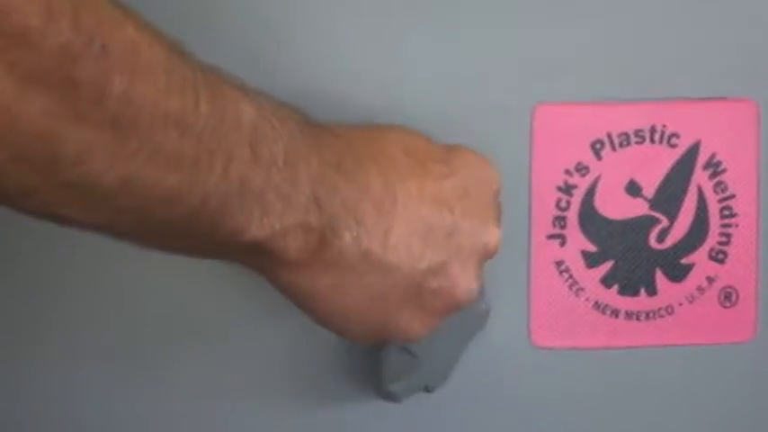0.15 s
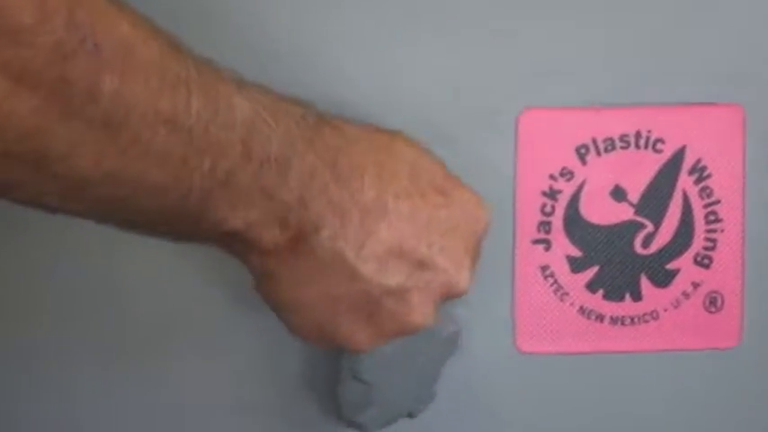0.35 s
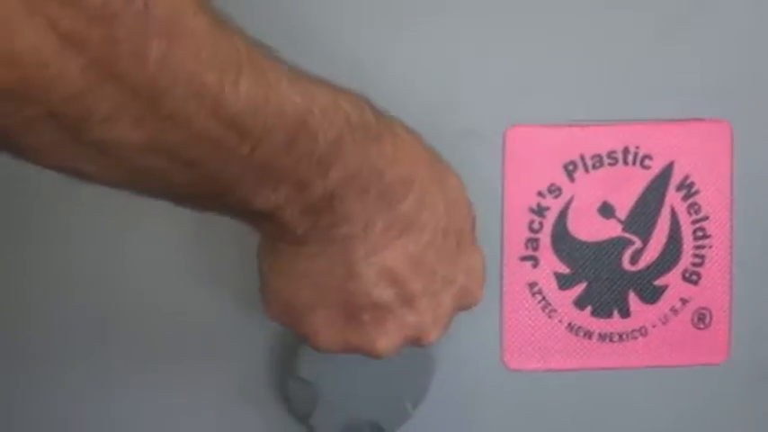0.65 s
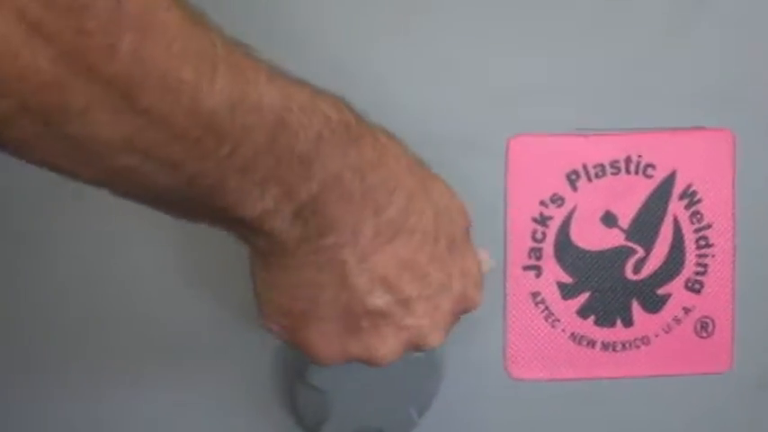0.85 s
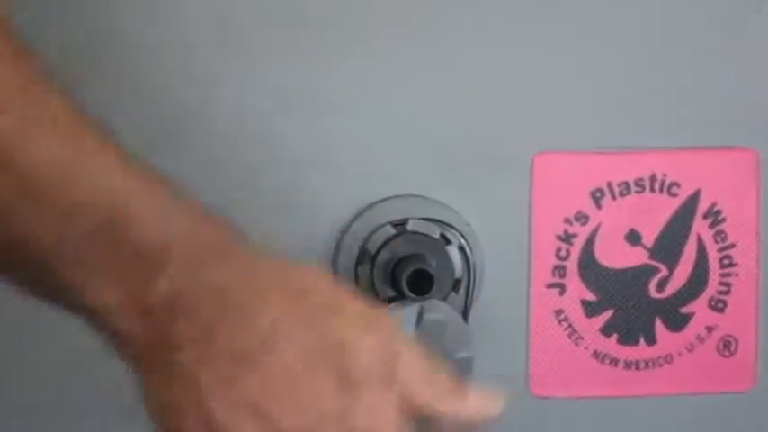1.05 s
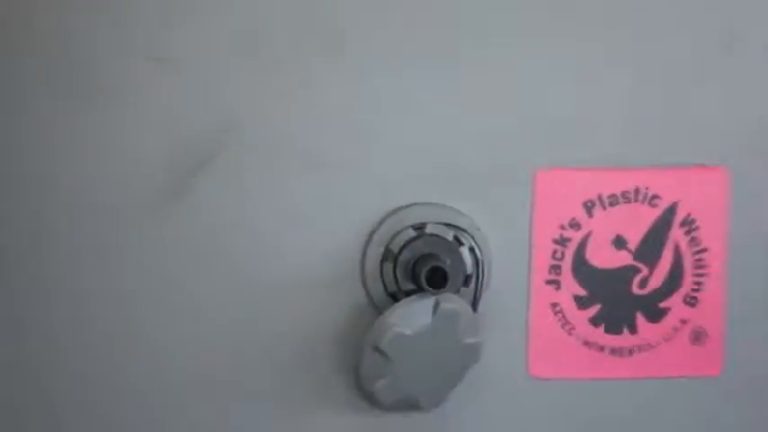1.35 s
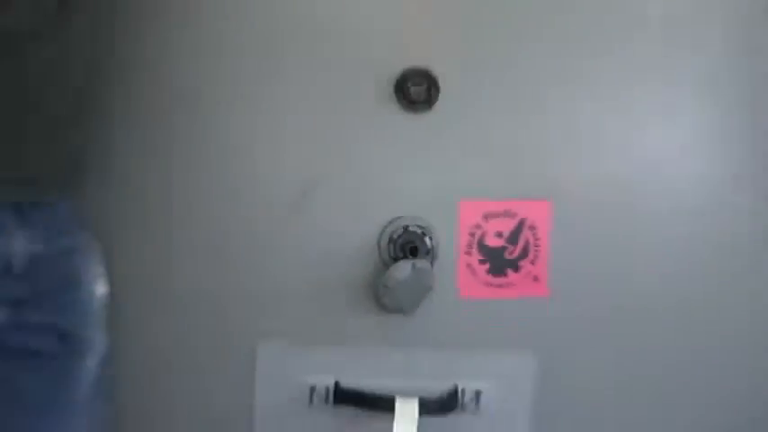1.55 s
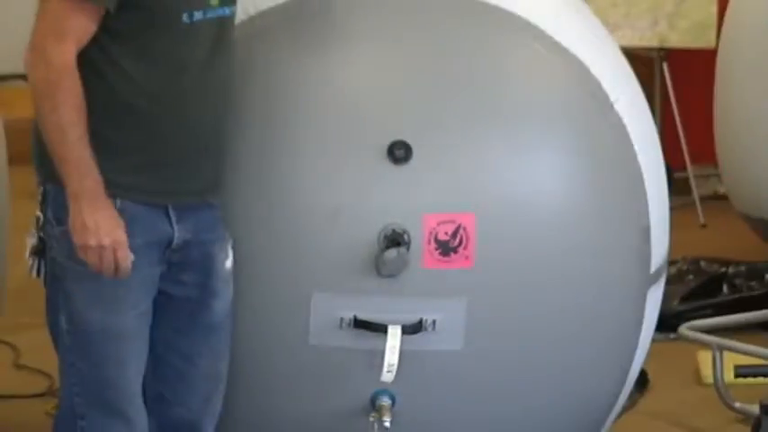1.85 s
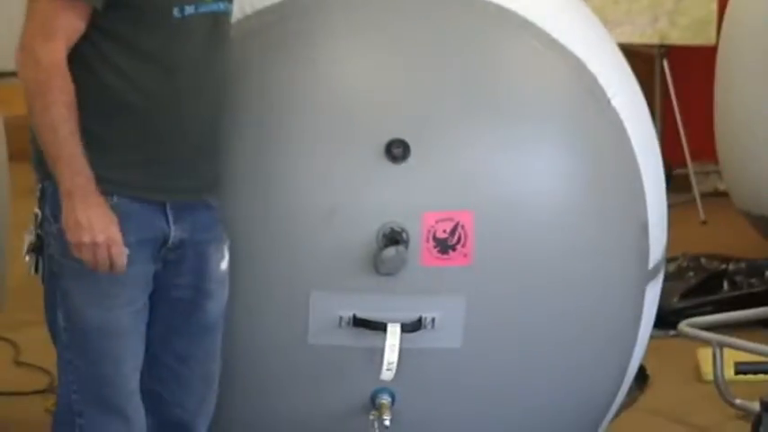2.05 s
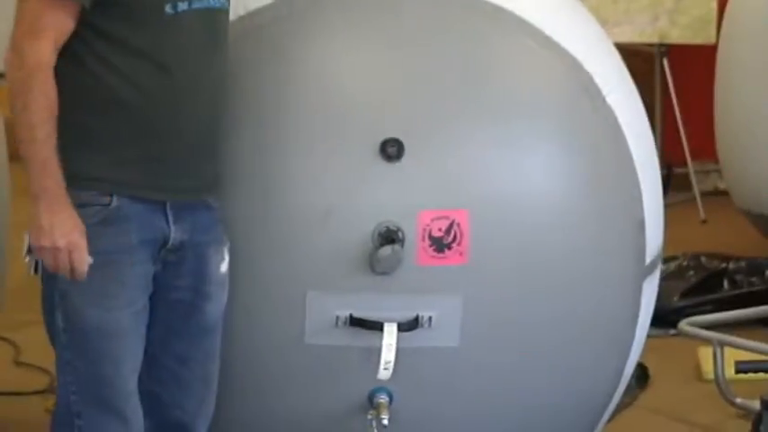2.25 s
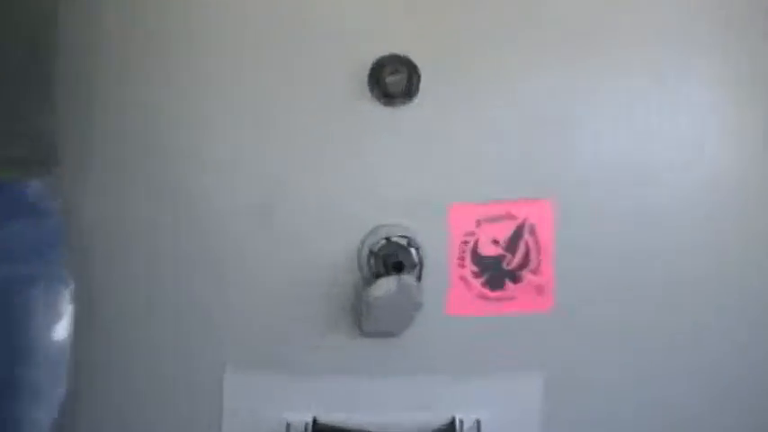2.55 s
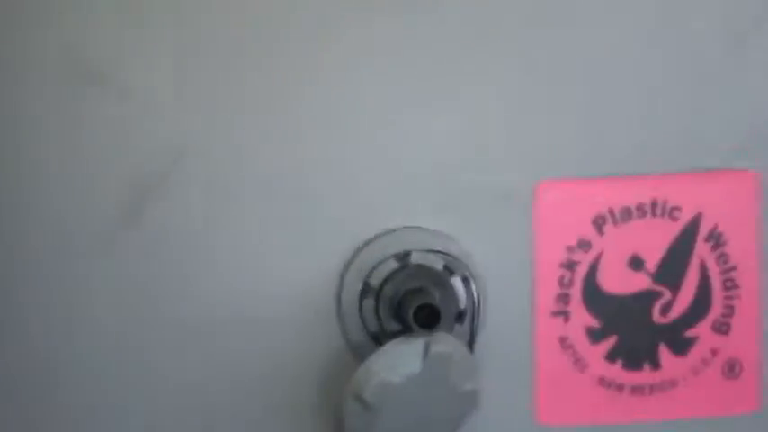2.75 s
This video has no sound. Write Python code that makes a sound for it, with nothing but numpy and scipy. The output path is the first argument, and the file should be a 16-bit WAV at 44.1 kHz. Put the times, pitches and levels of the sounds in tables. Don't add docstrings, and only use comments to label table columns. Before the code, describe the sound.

Air escapes from a big inflated plug in a workshop: a brief falling squeal as the valve opens, then a hiss muffled under a cupped hand, turning open and bright, heard close in stereo.

```python
import sys
import numpy as np
from scipy import signal
from scipy.fft import rfft, irfft, next_fast_len
from scipy.io import wavfile
from scipy.ndimage import uniform_filter1d, map_coordinates

SR = 44100
rng = np.random.default_rng(int(sys.argv[2]) if len(sys.argv) > 2 else 0)


def amplitude_ratio(level_db):
    exponent = np.asarray(level_db, float) / 20
    return 10 ** exponent


def unload_audio(sound):
    columns = np.transpose(np.atleast_2d(sound))
    steps = np.round(np.clip(columns, -1, 1) * 32767)
    wavfile.write(sys.argv[1], SR, steps.astype(np.int16))


N = 127890
TIME_S = np.arange(N) / SR
OPENS_S = 0.128
MONO_HZ = 11950


def unit(x):
    return x / np.sqrt(np.mean(x ** 2) + 1e-20)


def along(points, hz):
    point_hz, value = np.transpose(points)
    return np.interp(np.log(hz + 1), np.log(point_hz + 1), value)


def curves(rows):
    s, *columns = np.transpose(rows)
    return [np.interp(TIME_S, s, column) for column in columns]


def wobble(rate):
    knots = rng.standard_normal(int(N * rate / SR) + 4)
    return map_coordinates(knots, [np.arange(N) * rate / SR])


def filtered(x, response):
    size = next_fast_len(N + SR // 2)
    spectrum = rfft(x, size) * response(np.fft.rfftfreq(size, 1 / SR))
    return irfft(spectrum, size)[..., :N]


def peak(f, hz, width):
    return 1j * f * width / (hz * hz - f * f + 1j * f * width)


def patchy(depth_db):
    z = signal.stft(rng.standard_normal(N + 512), nperseg=512)[2]
    field = uniform_filter1d(rng.standard_normal(z.shape), size=8, axis=0)
    field = uniform_filter1d(field, size=12, axis=1)
    return signal.istft(z * amplitude_ratio(depth_db * unit(field)), nperseg=512)[1][:N]


# frequency in Hz, level in dB per Hz.
SHOP_COLOUR = [(35, -18), (70, -4), (260, -8), (800, -12), (2900, -22.5), (3500, -29), (8000, -33.5),
               (15700, -47)]


def shop():
    level_db, duck_db, duck_at_s, duck_s = -41, -15.5, 0.163, 0.03
    gain_db = level_db + duck_db * np.clip((TIME_S - duck_at_s) / duck_s, 0, 1)
    bed = filtered(rng.standard_normal((2, N)), lambda f: amplitude_ratio(along(SHOP_COLOUR, f)))
    mid = amplitude_ratio(gain_db) * unit(bed[0])
    side = amplitude_ratio(gain_db - 10.5) * unit(bed[1])
    return np.array([mid, side])


# frequency in Hz, width in Hz, level in dB.
AIR_MODES = [(90.1, 19, -55), (283.5, 13, -56.5), (570, 15, -57), (839, 8, -58), (934, 16, -53)]


def hum():
    early_db, start_s, rise_s = -10, 0.83, 0.33
    swell_db = early_db * (1 - np.clip((TIME_S - start_s) / rise_s, 0, 1))
    total = np.zeros(N)
    for hz, width, db in AIR_MODES:
        total += amplitude_ratio(db) * unit(filtered(rng.standard_normal(N), lambda f: peak(f, hz, width) ** 2))
    return amplitude_ratio(swell_db) * total


# start in seconds, pitch in Hz, level in dB, overtones in dB.
FLAP_SLIDE = [
    (.128, 515, -46, -22),
    (.143, 495, -11.5, -32),
    (.158, 464, -11.5, -17),
    (.163, 454, -24, -2),
    (.168, 446, -12.5, -13),
    (.179, 408, -13.5, -24),
    (.188, 378, -26, 3),
    (.228, 293, -20, 0),
    (.3, 298, -22.5, -3),
]


def squeal():
    fade_s, drift, rough = 0.42, 0.008, 0.04
    third_db = -15
    slack_at_s, slack_rise_s, slack_per_s, slack_depth = 0.19, 0.032, 75, 0.38

    hz, level_db, over_db = curves(FLAP_SLIDE)
    level_db = level_db - 60 * np.maximum(TIME_S - FLAP_SLIDE[-1][0], 0) / fade_s
    level_db = level_db - 200 * (TIME_S < FLAP_SLIDE[0][0])
    phase = 2 * np.pi * np.cumsum(hz * (1 + drift * wobble(61.3))) / SR
    overtones = np.sin(2 * phase) + amplitude_ratio(third_db) * np.sin(3 * phase) + amplitude_ratio(2 * third_db) * np.sin(4 * phase)

    slack = slack_depth * np.clip((TIME_S - slack_at_s) / slack_rise_s, 0, 1)

    def flutter():
        return 1 - slack + slack * wobble(slack_per_s) + rough * wobble(149.5)

    tone = flutter() * np.sin(phase) + amplitude_ratio(over_db) * flutter() * overtones
    return np.sqrt(2) * amplitude_ratio(level_db) * tone


# time in seconds, flow in dB, hand away (0 cupped, 1 lifting, 2 gone).
AIR_FLOW = [(.13, -46, 0.81), (.14, -38.5, 0.25), (.18, -40, 0.55), (.24, -27, 0.95), (.29, -27.5, 0.41),
            (.36, -20.5, 0.061), (.5, -21, 0), (.56, -23.5, 0), (.76, -21, 0.035), (.825, -20, 0.021),
            (.87, -21.5, 0.15), (.95, -21, 0.51), (1.06, -23, 1.36), (1.12, -25.5, 1.78),
            (1.33, -21.5, 2.05), (1.73, -22.5, 1.98), (1.85, -22.5, 2), (2.9, -22, 2.25)]
# frequency in Hz, level in dB per Hz.
CUPPED_COLOUR = [(88, -70), (150, -37), (800, -18), (2500, -6.5), (3600, -8), (6300, -0.5), (10000, -8.5),
                 (15700, -13.5)]
# frequency in Hz, level in dB per Hz.
LIFTING_COLOUR = [(88, -24), (150, -10.5), (300, -10), (700, -3), (1800, -0.5), (3600, -4.5), (6000, -3.5),
                  (15700, -13.5)]
# frequency in Hz, level in dB per Hz.
FREE_COLOUR = [(88, -38), (150, -16), (330, -14), (900, -8), (2000, -7), (6500, -5), (12000, -3.5),
               (15700, -5)]
# frequency in Hz, width in Hz, level in dB.
PIPE_MODES = [(2750, 500, 0), (5300, 350, 0), (8000, 600, 1), (10450, 350, 1), (11620, 300, 2),
              (12650, 1000, 3)]


def pipe(f):
    return np.sqrt(1 + sum(abs(amplitude_ratio(db) * peak(f, hz, width)) ** 2 for hz, width, db in PIPE_MODES))


def jet():
    patchy_db, flicker_db, sway_db, grit = 1, 0.38, 0.26, 0.068
    flow_db, away = curves(AIR_FLOW)
    rush = np.zeros(N)
    for place, colour in enumerate([CUPPED_COLOUR, LIFTING_COLOUR, FREE_COLOUR]):
        eddies = patchy(patchy_db) * amplitude_ratio(flicker_db * wobble(40.16)) * (1 + grit * wobble(900))
        share = np.clip(1 - abs(np.clip(away, 0, 2) - place), 0, 1)
        voiced = filtered(eddies, lambda f: amplitude_ratio(along(colour, f)) * pipe(f) * abs(1 - peak(f, 1, 90)))
        rush += np.sqrt(share) * unit(voiced)
    return amplitude_ratio(flow_db + sway_db * wobble(4.79)) * rush


# time in seconds, resonance in Hz, level in dB.
PALM_HOLLOW = [
    (.13, 2586, -52),
    (.15, 2950, -36),
    (.18, 2700, -39.5),
    (.4, 2670, -47),
    (.62, 2548, -52),
    (.84, 2694, -32),
    (.99, 2596, -36.5),
    (1.06, 2101, -34.5),
    (1.14, 1935, -46),
]


def palm():
    width_hz = 430
    hz, level_db = curves(PALM_HOLLOW)
    a, b = filtered(rng.standard_normal((2, N)), lambda f: 1 / (1 + (2 * f / width_hz) ** 2))
    phase = 2 * np.pi * np.cumsum(hz) / SR
    return amplitude_ratio(level_db) * unit(a * np.cos(phase) + b * np.sin(phase))


def surge():
    from_db, grows, level_db = -21.5, 2, -28
    hiss_hz, hiss_width_hz = 10200, 3900
    whistle_hz, whistle_width_hz, whistle_db = 5430, 83, -16
    flow_db, away = curves(AIR_FLOW)
    hiss = unit(filtered(patchy(1), lambda f: peak(f, hiss_hz, hiss_width_hz) ** 2))
    whistle = unit(filtered(patchy(0), lambda f: peak(f, whistle_hz, whistle_width_hz) ** 2))
    squeezed = np.clip(1 - away, 0, 1)
    return amplitude_ratio(level_db + grows * (flow_db - from_db)) * squeezed * (hiss + amplitude_ratio(whistle_db) * whistle)


# frequency in Hz, time to fall 60 dB in seconds.
WALL_DECAY = [(200, 0.43), (1000, 0.55), (5000, 0.29), (14000, 0.24)]


def room(x, echo_s):
    hz, t, z = signal.stft(rng.standard_normal((2, SR // 2)), SR, nperseg=256)
    decay = amplitude_ratio(-60 * t / along(WALL_DECAY, hz)[:, None])
    tail = signal.istft(z * decay, SR, nperseg=256)[1]
    late = np.pad(x, (round(echo_s * SR), 0))[None]
    return signal.fftconvolve(late, tail / np.linalg.norm(tail[0]), axes=1)[:, :N]


# frequency in Hz, left-right likeness from 0 to 1.
LIKENESS = [(60, 0.63), (180, 1), (550, 0.88), (1650, 0.98), (4970, 0.7), (15000, 0.41)]


def heard(x, wet_db, echo_s):
    a, b = amplitude_ratio(wet_db) * room(x, echo_s)
    middle = (x + a) / np.sqrt(1 + amplitude_ratio(2 * wet_db))
    spread = b / amplitude_ratio(wet_db)

    def split(hz):
        angle = np.arccos(np.clip(along(LIKENESS, hz), -1, 1)) / 2
        return np.array([np.cos(angle), np.sin(angle)])

    return filtered(np.array([middle, spread]), split)


# frequency in Hz, left minus right in dB.
BALANCE = [(60, 1.5), (240, 1), (950, -1.0), (3770, -1.5), (15000, 0.0)]


def scene():
    air = (jet() + palm() + surge()) * (TIME_S > OPENS_S)
    flap_heard = heard(squeal(), wet_db=-11, echo_s=0.035)
    air_heard = heard(air, wet_db=-8, echo_s=0.007)
    mid, side = shop() + flap_heard + air_heard
    mid = mid + hum()
    side = filtered(side, lambda hz: hz < MONO_HZ)

    def lean(hz):
        return amplitude_ratio(along(BALANCE, hz) * (hz < MONO_HZ) * np.array([[0.5], [-0.5]]))

    return filtered(np.array([mid + side, mid - side]), lean)


def band_limit(x):
    return signal.sosfilt(signal.butter(12, 16320, fs=SR, output="sos"), x)


def record(dry):
    top_hz, mic_hz, mic_width_hz, mic_db = 15760, 15580, 350, 5

    def mic(hz):
        return (hz < top_hz) * np.sqrt(1 + abs(amplitude_ratio(mic_db) * peak(hz, mic_hz, mic_width_hz)) ** 2)

    return band_limit(filtered(dry, mic))


dry = scene()
out = record(dry)
unload_audio(out)
```